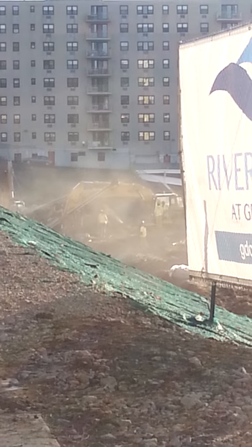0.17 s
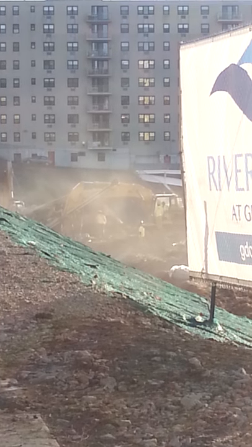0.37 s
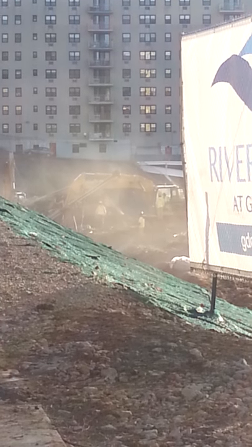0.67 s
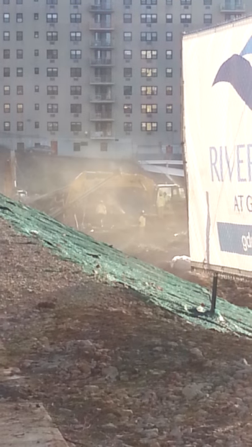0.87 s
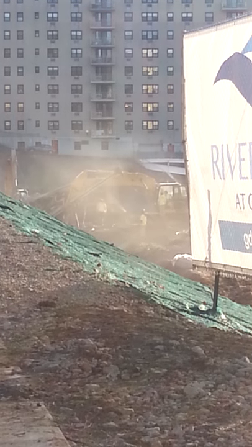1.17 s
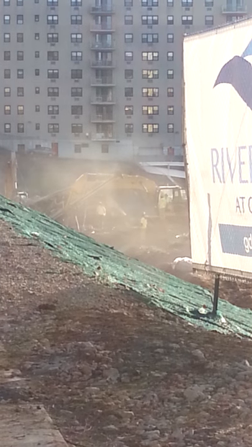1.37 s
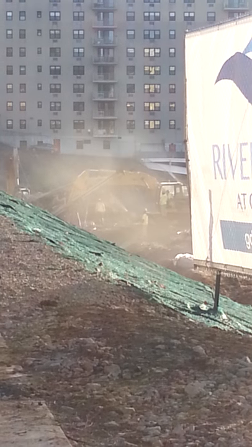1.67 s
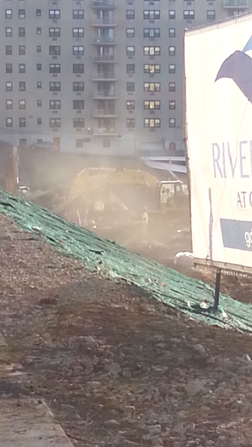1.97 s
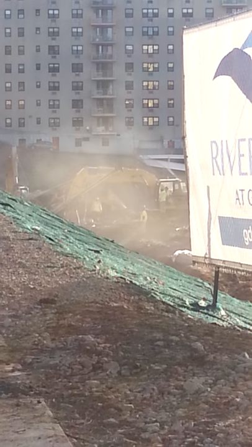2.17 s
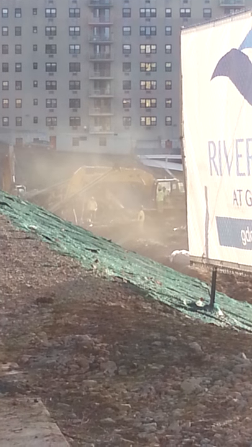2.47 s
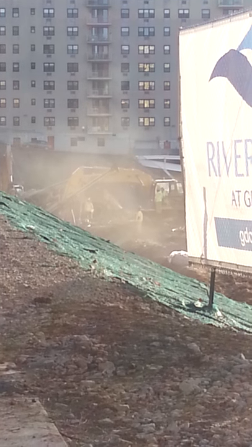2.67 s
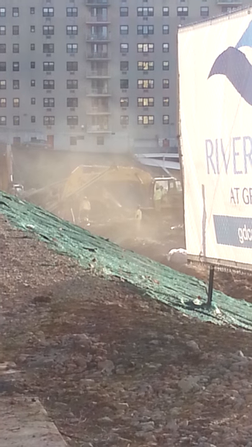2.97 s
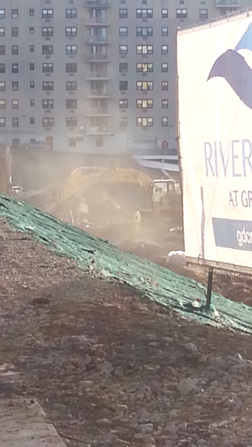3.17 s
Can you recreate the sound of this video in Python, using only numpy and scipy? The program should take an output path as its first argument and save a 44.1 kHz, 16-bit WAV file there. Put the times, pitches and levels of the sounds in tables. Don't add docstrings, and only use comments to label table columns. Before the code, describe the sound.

A short clattering run of steel knocks across an open building site, amid droning machinery

```python
import sys
import numpy as np
from scipy import signal
from scipy.fft import rfft, irfft, next_fast_len
from scipy.io import wavfile
from scipy.ndimage import uniform_filter1d, map_coordinates

SR = 44100
rng = np.random.default_rng(int(sys.argv[2]) if len(sys.argv) > 2 else 0)


def generate_wav(sig):
    pcm = np.round(np.clip(np.atleast_2d(sig).T, -1, 1) * 32767).astype(np.int16)
    wavfile.write(sys.argv[1], SR, pcm)


def attenuation_scalar(level_db):
    decades = np.asarray(level_db, float) / 20
    return 10 ** decades


N = 145971


def unit(x):
    return x / np.sqrt(np.mean(x ** 2) + 1e-20)


def shape(points, hz):
    f, db = np.transpose(points)
    return attenuation_scalar(np.interp(np.log(hz + 1), np.log(f + 1), db, left=-120, right=-120))


def curves(rows):
    s, *cols = np.transpose(rows)
    return [np.interp(np.arange(N) / SR, s, c) for c in cols]


def wobble(rate):
    knots = rng.standard_normal(int(N * 40 / SR) + 4)
    return map_coordinates(knots, [np.arange(N) * rate / SR])


def filtered(x, response):
    m = next_fast_len(N + SR // 2)
    return irfft(rfft(x, m) * response(np.fft.rfftfreq(m, 1 / SR)), m)[:N]


def rush(spectrum, patchy_db):
    z = signal.stft(rng.standard_normal(N), nperseg=512)[2]
    field = uniform_filter1d(rng.standard_normal(z.shape), size=5, axis=0)
    field = uniform_filter1d(field, size=12, axis=1)
    x = signal.istft(z * attenuation_scalar(patchy_db * unit(field)), nperseg=512)[1][:N]
    return unit(filtered(x, lambda hz: shape(spectrum, hz)))


def tones(hz, partials, flutter_db, smear):
    turn = 2 * np.pi * np.cumsum(hz * np.ones(N)) / SR
    out = np.zeros(N)
    for k, db in partials:
        level = np.sqrt(2) * attenuation_scalar(db + flutter_db * wobble(7.05))
        out += level * np.sin(k * turn + 6 * rng.random() + smear * wobble(9))
    return out


def pulse(at_s, rise_s, fall_s):
    t = np.arange(N) / SR - at_s
    return np.exp(-np.where(t < 0, -t / rise_s, t / fall_s) ** 1.75)


def steel_body(hz, mode_db, focus_hz):
    # (frequency [Hz], width [Hz], level [dB])
    steel = [(2119, 83, -5.5), (2335, 110, 1.5), (2450, 88, -9), (2600, 84, 0), (2960, 86, -5.5),
             (3150, 90, -3.5), (3240, 110, -5), (3670, 60, -1), (4150, 140, -6.5), (4890, 150, -8),
             (5400, 150, -35)]
    # (frequency [Hz], level [dB])
    scrape = [(1200, -26), (2100, -10), (3000, -6), (4000, -11), (5500, -20), (9000, -45)]
    # (frequency [Hz], gain [dB])
    air = [(20, -10.5), (3600, 0.5), (5000, -6.5), (7000, -4), (9000, -53), (20000, -75)]
    ring = 0
    for k, ((centre, width, db), luck_db) in enumerate(zip(steel, mode_db)):
        mode = 1j * hz * width / (centre * centre - hz * hz + 1j * hz * width)
        ring = ring + attenuation_scalar(db + luck_db) * mode * (-1) ** k
    octaves = np.log2((hz + 1) / focus_hz)
    focus = attenuation_scalar(5 * np.exp(-(octaves / .3) ** 2))
    return (ring + attenuation_scalar(-9) * shape(scrape, hz)) * focus * shape(air, hz)


def hammer():
    # (time of peak [s], level [dB], favoured frequency [Hz], thud level [dB])
    blows = [(1.414, -7.5, 3083, -19), (1.463, -12, 2700, -25.5), (1.518, -16.5, 2880, -20),
             (1.578, -13, 3000, -21.5), (1.606, -34, 3376, -28), (1.631, -30, 2830, -27),
             (1.66, -20, 3100, -28.5), (1.718, -17, 3166, -27.5), (1.787, -18, 3150, -57),
             (1.816, -27, 2587, -48), (1.892, -26, 3005, -53)]
    # (frequency [Hz], level [dB])
    ground = [(50, -27), (110, 3), (250, -1.5), (600, -1.5), (1500, -5.5), (4000, -10.5), (7000, -30)]
    rise_s, fall_s = .0115, .0055
    flurry_db, chatter_db = -10, 2.5
    out = np.zeros(N)
    for s, db, focus_hz, thud_db in blows:
        mode_db = rng.normal(0, 3.0, 11)
        chatter = attenuation_scalar(chatter_db * rng.standard_normal(N // 40 + 1).repeat(40)[:N])
        contacts = chatter * rng.standard_normal(N)
        clank = filtered(pulse(s, rise_s, fall_s) * contacts, lambda hz: steel_body(hz, mode_db, focus_hz))
        out += attenuation_scalar(db + flurry_db) * unit(clank) * np.sqrt((rise_s + fall_s) * SR / N)
        thud = pulse(s + .025, rise_s=.025, fall_s=.05) * rush(ground, patchy_db=1)
        out += attenuation_scalar(thud_db - 2.0) * thud
    return out


def strikes():
    # (time [s], low ring [dB], middle ring [dB], high ring [dB])
    contacts = [(1.405, -25, -28, -25), (1.407, -21, -27, -27), (1.413, -25, -20, -15.5),
                (1.417, -11, -16, -14.5), (1.4275, -32, -28, -23), (1.4355, -33, -32, -28),
                (1.446, -27, -34, -30), (1.4532, -18, -25, -29), (1.457, -14, -18, -26),
                (1.4624, -14, -14.5, -19), (1.472, -29, -25, -34), (1.503, -27, -27, -34),
                (1.5093, -17, -27.5, -36), (1.5133, -27, -13.5, -25), (1.518, -25, -15.5, -16),
                (1.5355, -27, -30, -30), (1.544, -28, -35, -30), (1.562, -39, -27, -32),
                (1.5717, -23, -20, -22), (1.5769, -10.5, -19, -26), (1.5805, -18, -15.5, -15),
                (1.587, -26, -29, -23), (1.5889, -28, -32, -28), (1.6025, -30, -35, -36),
                (1.607, -33, -27, -31), (1.612, -37, -34, -22), (1.629, -30, -25, -35),
                (1.652, -24, -29, -26), (1.655, -23, -24, -21), (1.658, -25, -29, -19),
                (1.663, -27, -33, -19), (1.674, -31, -31, -30), (1.71, -21, -30, -29),
                (1.7143, -28, -33, -22), (1.718, -32, -31, -18), (1.731, -34, -29, -24),
                (1.777, -22, -36, -28), (1.781, -19, -26, -21), (1.786, -30, -24, -14),
                (1.794, -30, -33, -28), (1.799, -31, -32, -24), (1.812, -20, -37, -34),
                (1.89, -32, -26, -28)]
    # (frequency [Hz], 60 dB decay [s], level [dB])
    rings = [(2060, 0.034, -9.5), (2457, 0.037, -7.5), (2567, 0.037, 0), (2874, 0.037, 0.5),
             (2850, 0.035, 0), (3120, 0.033, 0.5), (3234, 0.03, 3), (3600, .025, -8), (4170, 0.023, -10),
             (4650, 0.016, -14)]
    group_hz = [2540, 2870, 3220]
    out, t = np.zeros(N), np.arange(SR // 16) / SR
    hz, t60, db = np.transpose(rings)[..., None]
    onset = 1 - np.exp(-t / .0019)
    lucks = rng.standard_normal((len(contacts), len(rings), 3))
    for (s, *groups), luck in zip(contacts, lucks):
        level = db + np.interp(hz, group_hz, groups) + 1.9 * luck[:, :1] - 60 * t / t60
        mode_hz = hz * (1 + .006 * luck[:, 1:2])
        ring = attenuation_scalar(level) * np.sin(2 * np.pi * mode_hz * t + .7 * luck[:, 2:])
        out[round(s * SR):][:len(t)] += ring.sum(0) * onset
    return attenuation_scalar(3) * out


def slide():
    # (frequency [Hz], level [dB])
    drag = [(2000, -13), (3500, 1), (5000, -6), (7000, -19), (9500, -23)]
    return attenuation_scalar(-33) * pulse(1.349, rise_s=.004, fall_s=.03) * rush(drag, patchy_db=0.0)


def facades(x):
    t60_s, delay_s = .55, .017
    t = np.arange(SR) / SR
    tail = rng.standard_normal(SR) * attenuation_scalar(-60 * t / t60_s) * (t > delay_s)
    return signal.fftconvolve(x, tail / np.linalg.norm(tail))[:N]


def pump():
    # (time [s], pitch [Hz], load level [dB])
    load = [(0, 361, -10), (.3, 365.2, -10.5), (.42, 363.9, 0), (.53, 362, 3.5), (.62, 359.5, -1),
            (.73, 356.5, 0.5), (.84, 350.3, -3), (.92, 356.7, -5.5), (1, 361.8, -3), (1.15, 357.2, -10),
            (1.9, 363, -6), (2.3, 360.5, -15), (2.55, 365, -3.5), (2.8, 361.2, -20), (3.05, 363.3, -7),
            (3.3, 360.2, -6.5)]
    # (harmonic, level [dB rms])
    harmonics = [(1, -44), (2, -39.5), (3, -40.5), (4, -35.5), (5, -45), (10, -53), (11, -50)]
    # (time [s], pitch [Hz], level [dB])
    whistle = [(0, 3620, -55), (.25, 3620, -49), (.38, 3612, -44), (.55, 3605, -48), (.65, 3612, -44),
               (.8, 3613, -44), (.86, 3608, -53), (1.5, 3615, -51), (2.3, 3624, -51), (2.96, 3624, -48),
               (3.3, 3630, -52)]
    # (time [s], frequency [Hz], level [dB], half length [s])
    squeal = [
        (2.617, 1683, -34.5, 0.046),
        (2.74, 1665, -34, 0.043),
    ]
    hz, load_db = curves(load)
    whine = attenuation_scalar(load_db + 1.5 * wobble(20)) * tones(hz, harmonics, flutter_db=1.5, smear=.5)
    valve_hz, valve_db = curves(whistle)
    valve = attenuation_scalar(valve_db) * tones(valve_hz, [(1, 0)], flutter_db=1.5, smear=.5)
    t = np.arange(N) / SR
    sing = np.zeros(N)
    for s, f, db, half_s in squeal:
        swell = attenuation_scalar(db) * np.exp(-((t - s) / half_s) ** 2)
        sing += swell * np.sin(2 * np.pi * f * t + 1.5 * wobble(30))
    return whine + valve + sing


def engines():
    # (time [s], cycle rate [Hz])
    revs = [
        (0.0, 25.1),
        (0.82, 26.4),
        (2.11, 26.72),
        (2.74, 26.3),
        (2.8, 26.58),
        (3.3, 26.25),
    ]
    # (order of the cycle, level [dB rms])
    orders = [(2, -71), (4, -46.5), (5, -38), (6, -36), (7, -44.5), (8, -40.5), (11, -42)]
    # (time [s], pitch [Hz], level [dB])
    swell = [(0, 243, -25.5), (.2, 244, -40), (.39, 243.5, -29), (.5, 244, -39), (.58, 244, -28.5),
             (.75, 243, -36.5), (1.05, 245, -30), (1.32, 245, -42), (1.43, 245, -25.5), (1.58, 244, -25.5),
             (1.8, 245, -39.5), (1.97, 243, -27), (2.31, 242, -41.5), (2.39, 242, -26.5),
             (2.57, 244, -38.5), (3.03, 243, -25.5), (3.18, 242, -39), (3.3, 241, -29)]
    # (multiple of the pitch, level [dB re the main tone])
    multiples = [(.5, -16.5), (1, -1.5)]
    # (frequency [Hz], level [dB rms])
    fan = [(488.3, -40.5), (607, -44), (731, -44)]
    # (frequency [Hz], level [dB rms])
    idlers = [(67.2, -46), (86.3, -45.5), (641, -48), (680, -48)]
    cycle_hz, = curves(revs)
    diesel = tones(cycle_hz, orders, flutter_db=2.0, smear=0.29)
    hz, level_db = curves(swell)
    hum = attenuation_scalar(level_db) * tones(hz, multiples, flutter_db=1.0, smear=0.21)
    steady = tones(1, fan, flutter_db=2, smear=.4) + tones(1, idlers, flutter_db=1, smear=.35)
    return diesel + hum + steady


def click():
    # (time after the start [s], size)
    touches = [
        (0, .8),
        (.00045, -1),
        (.0009, .8),
        (.0015, -.5),
    ]
    # (frequency [Hz], level [dB])
    tick = [(2000, -30), (5000, -3), (7000, -9), (10000, -5), (13500, 0), (15000, -3)]
    start_s, length_s = 1.2124, .002
    taps = np.zeros(N)
    for s, size in touches:
        taps[round((start_s + s) * SR)] = size
    return attenuation_scalar(-30) * unit(filtered(taps, lambda hz: shape(tick, hz))) * np.sqrt(length_s * SR / N)


def roar():
    # (frequency [Hz], level [dB per Hz])
    rumble = [(21, -52), (35, -19.5), (144, -7), (250, 2), (440, -3.5), (716, -2.5), (787, -6), (997, -10),
              (1500, -11.5), (1950, -13.5), (3300, -120)]
    # (frequency [Hz], level [dB per Hz])
    airy = [(600, -8.5), (1000, 2), (1500, -2.5), (3600, -8), (5000, -17.5), (7500, -31.5), (9000, -43.5)]
    shared_db = 0.5 * wobble(1.404) + 0.71 * wobble(17)
    rumble_db = -30 + .4 * wobble(5) + shared_db
    airy_db = -30.5 + .4 * wobble(6) + shared_db
    return attenuation_scalar(rumble_db) * rush(rumble, patchy_db=1.4) + attenuation_scalar(airy_db) * rush(airy, patchy_db=1.1)


def scene():
    blows = slide() + hammer() + strikes()
    echo = attenuation_scalar(-11) * facades(blows)
    return (blows + echo + pump() + engines() + click() + roar())[None]


def top_cut(x):
    return signal.sosfilt(signal.butter(12, 14950, fs=SR, output="sos"), x)


def record(dry):
    # (frequency [Hz], level [dB per Hz])
    self_noise = [(6000, -6), (8000, 0), (15000, -2)]
    self_db, duck_db, duck_over_db, duck_s = -62, -14, 3, .09
    ringing = filtered(dry[0], lambda hz: (hz > 2000) & (hz < 4000))
    power = np.abs(uniform_filter1d(ringing ** 2, int(duck_s * SR)))
    over_db = 10 * np.log10(power / np.median(power) + 1e-9)
    duck = np.clip(over_db / duck_over_db - .5, 0, 1)
    hiss = attenuation_scalar(self_db + duck_db * duck) * rush(self_noise, patchy_db=1)
    return top_cut(dry + hiss)


dry = scene()
out = record(dry)
generate_wav(out)
```